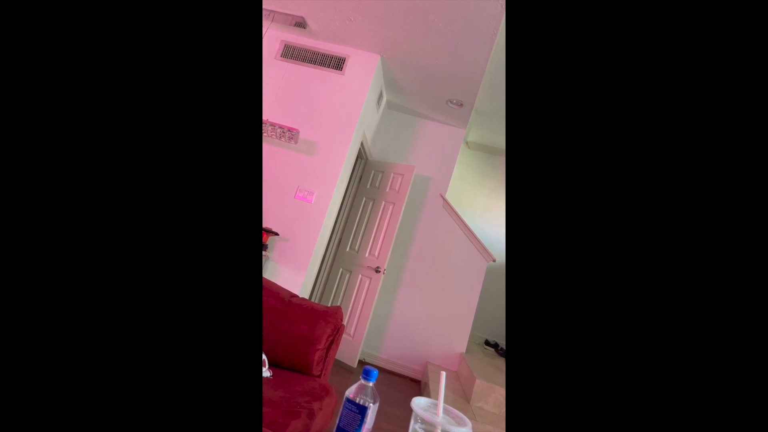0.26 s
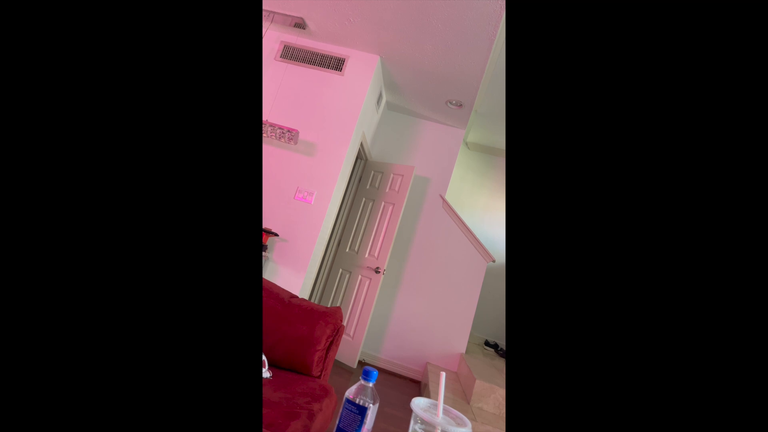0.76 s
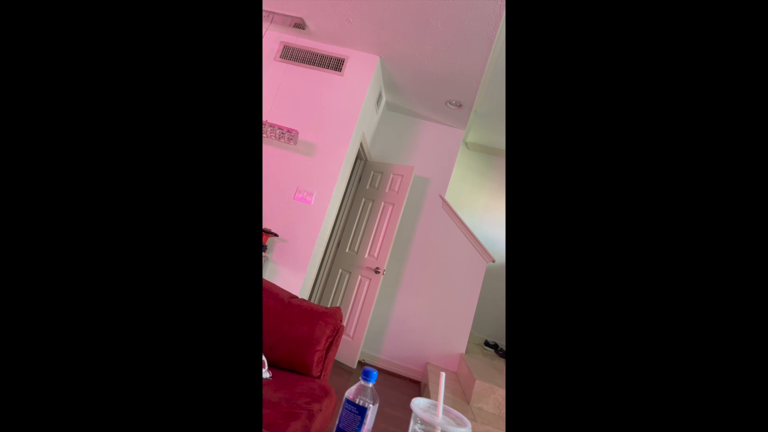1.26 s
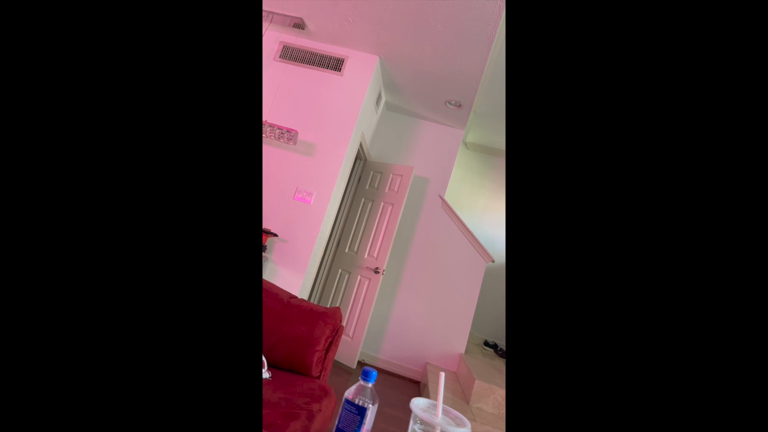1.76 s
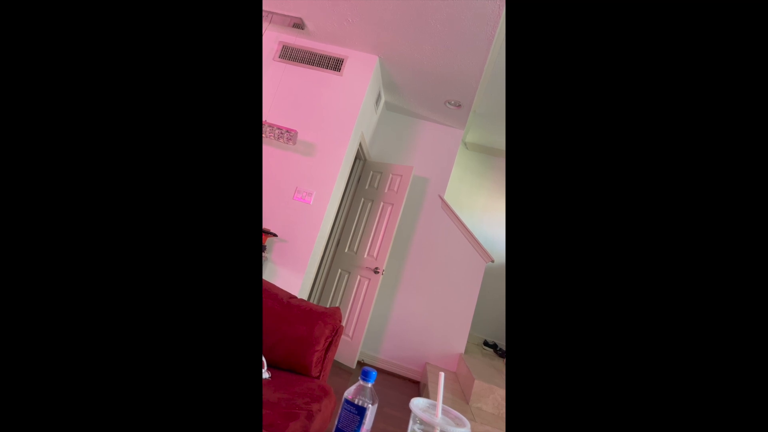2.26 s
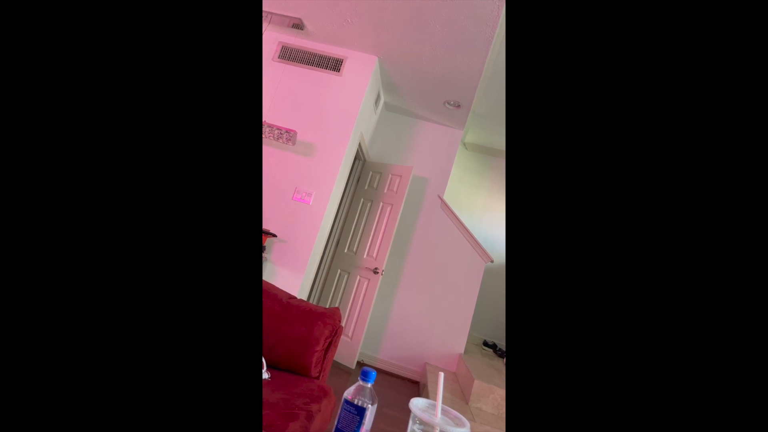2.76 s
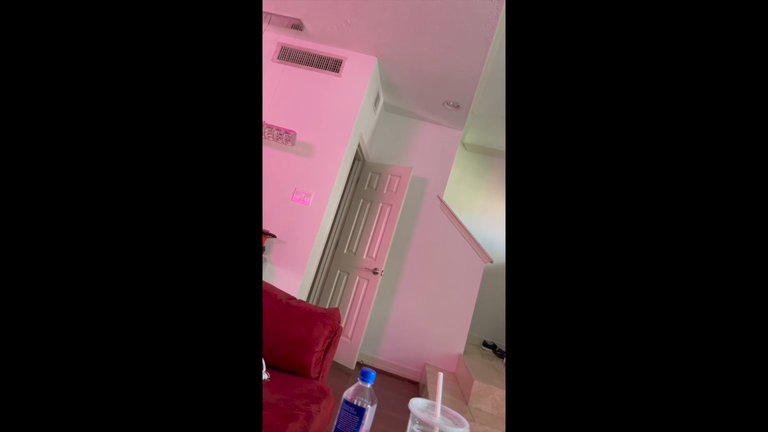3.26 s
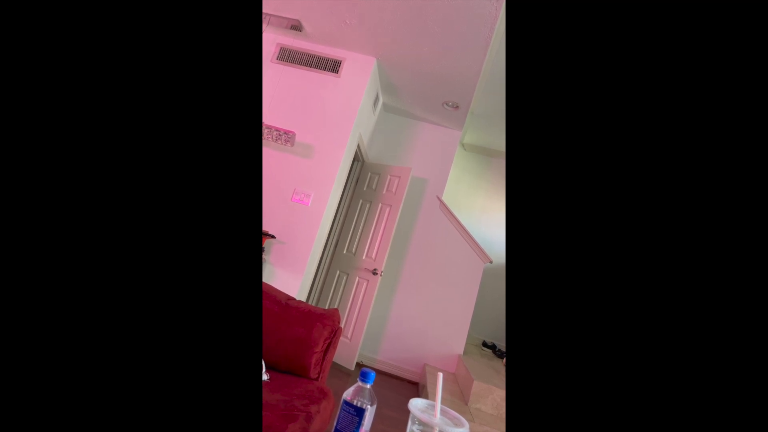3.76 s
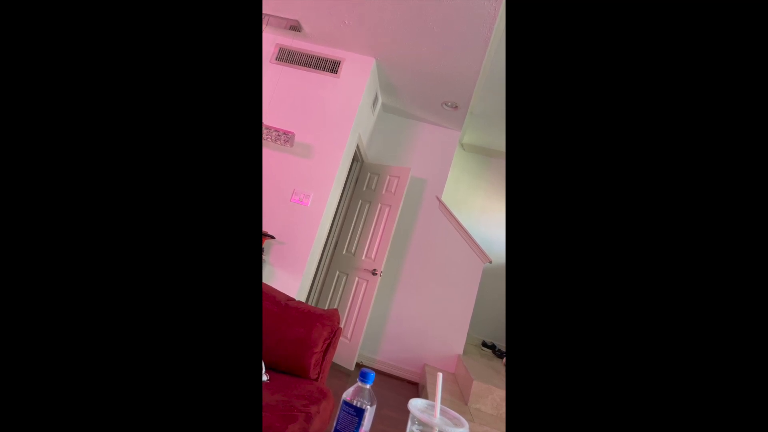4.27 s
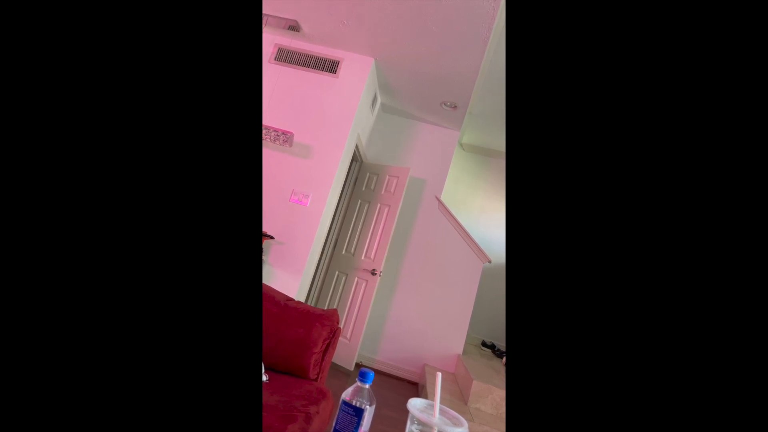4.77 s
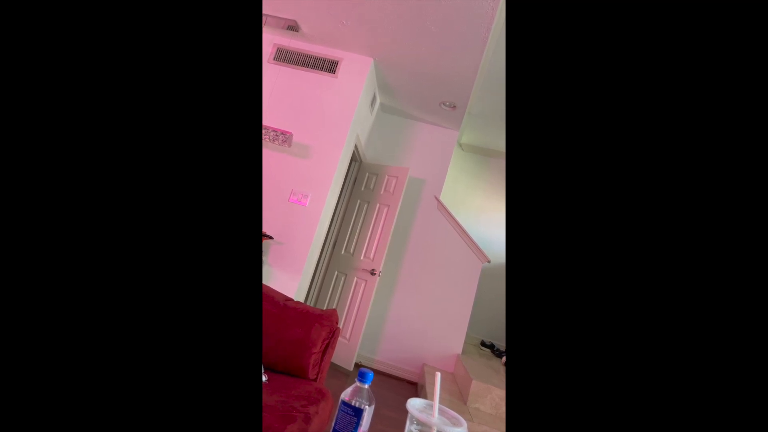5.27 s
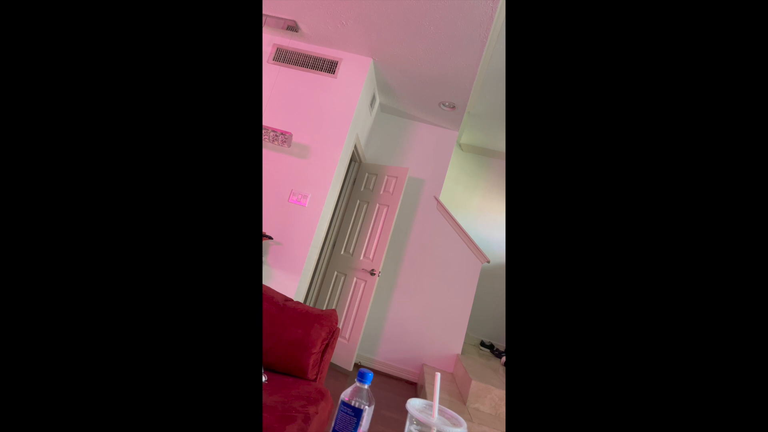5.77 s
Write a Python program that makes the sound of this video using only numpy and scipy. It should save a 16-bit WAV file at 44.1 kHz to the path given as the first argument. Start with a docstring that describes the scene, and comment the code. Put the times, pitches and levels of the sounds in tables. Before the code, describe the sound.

From 0 to 1.7 seconds a quiet bedroom is heard: a steady low air-conditioning hum, bass-heavy moving air with a faint vent whistle, small soft rustles near the microphone, the clearest around 1.6, and very faint high bird peeps between 0.45 and 1.2. At about 1.7 a hammer drill next door starts, its pitch and loudness climbing with a rumbling boom, reaching full speed near 2.35. Until about 3.7 it holds a loud, rough buzz of roughly fifty blows per second, with gritty grinding, a metallic bit ring and wide bright fan hiss; the tone wavers as the bit shifts. It eases and dulls, is released at 3.9, drops in pitch and dies by about 4.3. Hum and air remain to the end at about 6 seconds, with light rustles at 4.3, 4.7 and 5.4 and faint peeps from 5.1 to 5.7.

```python
"""A quiet bedroom: air conditioning hums and whispers, something rustles, a bird peeps faintly outside.
Then a hammer drill next door spins up, bites into the wall and stops.
Its blows are wavering multiples of the blow rate, coloured by wall and room into a buzz.
Shaped noise makes its grinding and fan hiss, the air and the rustle; resonances ring bit, wall and vent."""
import sys
import numpy as np
from scipy import signal
from scipy.fft import rfft, irfft, next_fast_len
from scipy.io import wavfile
from scipy.ndimage import uniform_filter1d

SR = 44100
rng = np.random.default_rng(int(sys.argv[2]) if len(sys.argv) > 2 else 0)


def generate_wav(signal):
    """Clip the signal to [-1, 1] and save it as 16-bit WAV at the path in sys.argv[1]."""
    frames = np.transpose(np.atleast_2d(signal))
    scaled = np.clip(frames, -1, 1) * 32767
    pcm = np.round(scaled).astype(np.int16)
    wavfile.write(sys.argv[1], SR, pcm)


N = 264898

# compressors and mains a little out of step: (pitch [Hz], level [dB rms], left over right [dB])
HUM_TONES = [(55.1, -54.5, 0), (58.45, -60, 0), (58.8, -59.5, 0), (59.95, -57.5, -0.5),
             (116.95, -50.5, 1.5), (176, -79.5, 5), (233.6, -72.5, 7), (288, -73.5, 10), (328.5, -75.5, 9),
             (414.2, -69.5, 8), (474, -72.5, 13), (530, -77, 2.5)]
# air spectra, centre and side: (frequency [Hz], relative density [dB per Hz])
AIR_CENTRE = [(15, -31), (30, -12.5), (45, -7), (75, -4.5), (122, -8), (168, -8), (301, -14.5),
              (472, -22.5), (600, -21.5), (1130, -33.5), (2000, -38), (3000, -48), (5000, -55.5),
              (8000, -58), (8700, -76), (11300, -79), (12500, -55), (14000, -62)]
AIR_SIDE = [(15, -52.5), (25, -18.5), (60, -17), (107, -0.5), (257, -7.5), (472, -3), (1600, -22.5),
            (3530, -33.5), (4850, -44.5), (5390, -44), (8910, -39), (12900, -42.5), (14000, -56)]
# how far side noise follows centre; the bass leans left: (frequency [Hz], likeness [0..1])
NOISE_LEAN = [(60, .3), (250, 0.31), (500, 0.088), (1000, .01)]
# vent grille resonances: (pitch [Hz], width [Hz], level before flicker [dB rms])
VENT_RESONANCES = [(1833, 79, -81.5), (1280, 25, -90.5), (2650, 310, -87.5), (3510, 550, -88)]
# rustle swells: (start [s], peak level [dB], time to peak [s])
RUSTLES = [(0.0, -87, 0.033), (.3, -81, 0.15), (.6, -77, 0.089), (1.1, -92, 0.058), (1.58, -73.5, 0.035),
           (4.26, -80, 0.067), (4.72, -86.5, 0.06), (5.35, -79, 0.044), (5.45, -88.5, .15)]
# rustle spectrum: (frequency [Hz], relative density [dB per Hz])
RUSTLE_COLOUR = [(800, -26.5), (1500, 0), (2600, 1.5), (4200, -3.5), (5500, -18), (8500, -25.5),
                 (11000, -32), (13000, -9.5), (14000, -18.5)]
# bird peeps: (start [s], peak level [dB], pitch [Hz], time to peak [s])
PEEPS = [(0.4534, -82.5, 6130, 0.043), (0.704, -84, 6200, 0.025), (1.097, -89, 6150, 0.036),
         (5.098, -85.5, 6150, 0.02), (5.44, -90, 6200, 0.028), (5.666, -79.5, 6170, 0.043)]
# how hard the bit works in the wall, as loudness: (time [s], level [dB])
LOAD = [(1.695, -74), (1.83, -58), (1.95, -46.5), (2.1, -41), (2.29, -39.5), (2.39, -36.5), (2.6, -36.5),
        (3.03, -37.5), (3.28, -36.5), (3.4, -39.5), (3.5, -40.5), (3.56, -40), (3.66, -38), (3.85, -37.5),
        (3.93, -39), (4.0, -45), (4.07, -51), (4.15, -60.5), (4.35, -74)]
# wall and room response at full speed, one row per multiple of the blow rate from the 2nd up:
# (relative centre [dB], relative side [dB], lean [-1 right .. 1 left])
BUZZ_RESPONSE = [(-56.5, -78.5, 0.9), (-70.0, -82.5, 1.0), (-49.0, -62.0, 1.0), (-68.5, -85.5, -0.2),
                 (-67.0, -68.5, 0.9), (-49.0, -55.5, 0.9), (-43.0, -50.5, 0.7), (-49.5, -58.0, 1.0),
                 (-73.5, -56.0, -0.1), (-59.5, -56.0, -0.8), (-54.5, -51.0, -0.8), (-51.0, -56.5, -0.7),
                 (-52.5, -61.5, 0.0), (-54.5, -65.5, -0.7), (-49.0, -50.0, 0.6), (-52.5, -60.5, 0.8),
                 (-56.0, -53.5, 0.5), (-50.5, -54.5, 0.1), (-46.5, -53.5, -1.0), (-61.5, -54.5, -0.7),
                 (-48.5, -61.0, -0.9), (-45.5, -52.5, 0.5), (-54.0, -50.0, 0.4), (-44.5, -65.5, -0.2),
                 (-56.5, -53.0, -0.1), (-52.5, -56.5, -1.0), (-61.0, -57.0, -0.9), (-52.5, -53.0, -0.5),
                 (-47.5, -64.0, 1.0), (-43.0, -62.5, 0.2), (-50.5, -48.5, -0.7), (-48.0, -50.5, -1.0),
                 (-49.5, -56.0, 0.3), (-50.0, -63.0, -0.9), (-48.0, -58.5, 0.6), (-47.0, -60.0, 1.0),
                 (-53.5, -63.5, 0.3), (-56.5, -63.0, 0.3), (-59.5, -62.0, 0.9), (-54.5, -55.5, -0.7),
                 (-51.5, -54.5, 0.0), (-60.0, -58.0, 0.7), (-52.0, -52.0, 1.0), (-59.5, -54.5, 1.0),
                 (-49.5, -58.0, -0.5), (-54.0, -54.5, 0.8), (-55.5, -59.0, 0.0), (-51.5, -62.5, 0.2),
                 (-62.5, -57.0, -0.3), (-54.0, -56.0, -1.0), (-56.5, -68.5, -0.8), (-60.0, -51.0, -0.4),
                 (-59.5, -56.0, 0.8), (-58.5, -67.0, -0.8), (-57.0, -54.0, -0.9), (-56.0, -56.5, -0.7),
                 (-58.0, -63.5, -0.5), (-56.0, -58.5, -0.6), (-58.0, -66.0, -1.0)]
# the same for higher multiples, before random scatter: (frequency [Hz], relative level [dB])
UPPER_BUZZ = [(3100, -61), (3300, -64), (3550, -60.5), (3700, -63.5), (3930, -57.5), (4150, -63.5),
              (4300, -61), (4500, -64.5), (4700, -63), (5000, -69.5), (5300, -70.5), (6200, -77.5)]
# buzz swells as the bit shifts in the hole: (time [s], low [dB], middle [dB], high region [dB])
SHIFTS = [(2.3, -3, -3, 0), (2.4, -4, -0.4, 0.5), (2.54, -5, 1, -1), (2.62, -1, 1.3, 1), (2.69, -7, 1.5, 1),
          (2.77, 0.5, -1.2, 2), (2.85, -3, 1.5, 2), (2.95, 3, -1, 0.5), (3.04, -2.5, 0, 1),
          (3.11, -2, 1, 1), (3.19, 2.5, -4, 1.7), (3.3, 0, -1, 1.5), (3.4, 0, 0.6, 0), (3.47, 1, -7, -3.5),
          (3.53, -2, -0.9, -5), (3.62, 3, 1.5, 0), (3.73, 3.5, -3.5, 0.5), (3.8, -1, 1.1, 0),
          (3.87, 3, -4, 0), (3.96, -1, -5, -8)]
# those regions: (centre at full speed [Hz], width [octaves])
SHIFT_REGIONS = [(1200, 0.18), (1720, 0.184), (2450, 0.36)]
# grinding spectra, centre and side: (frequency [Hz], relative density [dB per Hz])
GRIND_CENTRE = [(70, -31.5), (150, -13), (250, -6.5), (350, -9), (600, -7), (900, -4), (1100, -8),
                (1300, -3), (1800, -2.5), (2400, -6), (3300, -6.5), (4400, -7), (6500, -24.5), (8400, -76)]
GRIND_SIDE = [(70, -46.5), (140, -21), (250, -12.5), (420, -8), (900, -3.5), (1500, 0), (2800, -1),
              (4700, -9), (6500, -36.5), (8400, -58.5)]
# wall resonances heard away from full speed: (pitch [Hz], width [Hz], level against the load [dB])
WALL_RESONANCES = [(225, 90, -18.5), (1410, 810, -16.5), (410, 80, -21.5), (678, 60, -16.5),
                   (760, 360, -14), (993, 63, -16), (1298, 56, -16), (1603, 130, -14.5), (1934, 120, -17.5),
                   (2420, 61, -22)]
# motor fan spectra, centre and side: (frequency [Hz], relative density [dB per Hz])
FAN_CENTRE = [(3530, -6.5), (6000, -2), (6770, -4), (8980, 8), (9850, -1), (10400, -87), (11000, -5),
              (11600, -1.5), (12700, -6), (14000, -7)]
FAN_SIDE = [(3240, -55), (5500, -16), (5880, -22), (6660, -34), (8450, 0.5), (8960, 0), (10200, -2),
            (11700, -11), (13200, -24), (14000, -49)]
# top of the hiss against the rest of it: (time [s], level [dB])
TOP_LEVEL = [(2.2, 1), (2.28, -1), (2.36, 0.5), (2.6, 3.5), (3.0, 2.5), (3.25, 4), (3.35, 1.5), (3.45, -4),
             (3.55, -3), (3.63, -0.5), (3.8, -1), (3.9, -1.5), (4.0, -10), (4.1, -9)]

AIR_DB = -55.5
# trigger pulled, full speed reached, let go, silence
START_S, FULL_S, OFF_S, END_S = 1.696, 2.355, 3.87, 4.35
FULL_SPEED_HZ = 51.72      # blows per second
SPIN_UP_HZ_PER_S, COAST_HZ_PER_S = 42, 54
SETTLE_S, LET_GO_S = 0.03, 0.01      # corner rounding; speed breaks off more abruptly than it settles
WOBBLE_HZ, WOBBLE_RATE_HZ = 0.08, 6      # the blow rate wavers
FULL_LOAD_DB, SLACK_DULL_DB_PER_OCT_PER_DB = -38, 0.32      # below this load the sound dulls
EASE_S, EASE_LENGTH_S, EASE_DULL_DB_PER_OCT = 3.682, 0.29, -18      # the bit is eased off
BUZZ_DB, STUMBLE_LOSS_DB = 1.68, 5      # against the load; loss away from full speed
SEATED_S, SEATING_S = 2.46, 0.013      # until the bit has seated, the wall booms around one pitch
BOOM_HZ, BOOM_OCTAVES, BOOM_DB = 730, 0.16, 6
CONTROL_STEP = 50      # samples between slow control values
# full depths, reached by high multiples only
WANDER_DB, WANDER_RATE_HZ, FLUTTER_DB, FLUTTER_RATE_HZ = 1.0, 3, 2.2, 7
PATCH_DB, PATCH_RATE_HZ, PATCH_SIZE = 2.2, 6, 5      # groups of high multiples swell together
GRIND_DB, SLOW_GRIND_DB = -8.5, 21      # against the load; gain towards standstill in spin-up
BIT_HZ, BIT_WIDTH_HZ, BIT_DB, SLOW_BIT_DB = 4280, 25, -17, 9.6      # same references
FAN_DB, FAN_POWER = -46, 1.94      # at full speed and load; amplitude power of spin-up speed
FAN_FOLLOWS = 0.86      # share of the slackening that the hiss follows
FAN_RISE_DB, FAN_RISE_S = -26, 0.097
FAN_RUNS_ON_S, FAN_DYING_DB_PER_S = 0.14, -120      # after let-go
FAN_DULLING_DB_PER_OCT_PER_S = -15.5      # from let-go
TOP_HZ = 10400      # the hiss above has its own level
STOPBAND_HZ = 14131


def from_db(db):
    """Decibels to gain."""
    return 10 ** (np.asarray(db) / 20)


def rms_one(x):
    """Scale to rms 1."""
    return x / np.sqrt(np.mean(x ** 2) + 1e-20)


def in_time(rows):
    """Columns of a curve table, sample by sample."""
    s, *columns = np.transpose(rows)
    return [np.interp(np.arange(N) / SR, s, c) for c in columns]


def at_hz(points, hz):
    """Read a spectrum on a log-frequency axis."""
    table_hz, values = np.transpose(points)
    return np.interp(np.log(hz), np.log(table_hz), values)


def drift(rate_hz, span=slice(None)):
    """Slow random control of rms 1: noise through a double one-pole low-pass."""
    pole = np.exp(-200 * np.pi * rate_hz / SR)      # one value per 100 samples
    noise = rng.standard_normal(N // 100 + 2002)
    slow = signal.lfilter([1], [1, -2 * pole, pole * pole], noise)[2000:]      # settled part
    return np.interp(np.arange(N)[span] / 100, np.arange(len(slow)), rms_one(slow))


def swell(s, rise_s):
    """A quick rise to 1 and a longer fall."""
    age = np.clip((np.arange(N) / SR - s) / max(rise_s, 0.007), 0, 30)
    return age * np.exp(1 - age)


def soft_ramp(seconds, corner_s=SETTLE_S):
    """Time past a moment, with the corner rounded."""
    return corner_s * np.logaddexp(0, seconds / corner_s)


def stereo_noise(spectrum, side, side_db, patchy_db, tilt_db=0, count=11):
    """Coloured centre and side noise in flickering octave bands; centre rms 1 before flicker and tilt."""
    size = next_fast_len(N)
    hz = np.maximum(np.arange(size // 2 + 1) * SR / size, 1)
    mid, other = rfft(rng.standard_normal((2, size)))
    lean = np.clip(at_hz(NOISE_LEAN, hz), 0, 0.95)
    other = lean * mid + np.sqrt(1 - lean ** 2) * other
    mid = mid * from_db(at_hz(spectrum, hz))
    other = other * from_db(at_hz(side, hz) + side_db)
    pair = np.array([mid, other])
    scale = np.std(irfft(mid, size))
    out = 0
    for octave in range(5 - count, 5):      # around 1 kHz; overlapping windows add up to one
        window = np.cos(np.pi / 2 * np.clip(np.log2(hz / 1000) - octave, -1, 1)) ** 2
        gain_db = patchy_db * drift(3.4) + tilt_db * max(octave - 1, 0)
        out = out + irfft(pair * window, size)[:, :N] * from_db(gain_db)
    return np.array([out[0] + out[1], out[0] - out[1]]) / scale


def resonant_noise(hz, width_hz):
    """Stereo noise twice through one resonance; rms 1."""
    b, a = signal.iirpeak(hz, hz / width_hz, fs=SR)
    once = signal.lfilter(b, a, rng.standard_normal((2, N)))
    return rms_one(signal.lfilter(b, a, once))


def above(x, edge_hz):
    """The part of a sound above a pitch."""
    size = next_fast_len(N)
    keep = np.arange(size // 2 + 1) * SR / size > edge_hz
    return irfft(rfft(x, size) * keep, size)[:, :N]


def hum():
    """Steady machine tones that waver slightly in phase and level."""
    t, out = np.arange(N) / SR, 0
    for hz, level_db, pan_db in HUM_TONES:
        waver_rad = min(hz / 240, 0.5) * drift(1.5)
        tone = np.sqrt(2) * np.sin(2 * np.pi * hz * t + rng.uniform(0, 2 * np.pi) + waver_rad)
        pan = from_db([[pan_db / 2], [-pan_db / 2]])
        out = out + tone * from_db(level_db + 0.9 * drift(2.5)) * pan
    return out


def moving_air():
    """Broad, bass-heavy air noise."""
    return from_db(AIR_DB) * stereo_noise(AIR_CENTRE, AIR_SIDE, side_db=-16.5, patchy_db=1.55)


def vent():
    """The grille sings faintly: air noise passed twice through each resonance."""
    out = 0
    for hz, width_hz, level_db in VENT_RESONANCES:
        out = out + from_db(level_db + 3.5 * drift(5.0)) * resonant_noise(hz, width_hz)
    return out


def rustle():
    """Short swells of soft noise close by."""
    level = sum(from_db(peak_db) * swell(s, rise_s) for s, peak_db, rise_s in RUSTLES)
    return level * stereo_noise(RUSTLE_COLOUR, RUSTLE_COLOUR, side_db=-1.5, patchy_db=-2.0, count=7)


def bird():
    """Far peeps, blurred by echoes into a narrow band of noise."""
    out = np.zeros((2, N))
    for s, peak_db, hz, rise_s in PEEPS:
        band = signal.butter(2, [hz - 130, hz + 130], "band", fs=SR, output="sos")
        noise = rms_one(signal.sosfilt(band, rng.standard_normal((2, N))))
        out += from_db(peak_db) * swell(s, rise_s) * noise
    return out


def buzz(blows, speed_hz, tilt_db):
    """Regular blows: multiples of the blow rate, coloured by wall and room, wandering as the bit shifts."""
    on = slice(int(START_S * SR), int(END_S * SR))
    steps = slice(on.start, on.stop, CONTROL_STEP)
    fine, coarse = np.arange(N)[on], np.arange(N)[steps]
    speed = speed_hz[steps]
    multiples = np.arange(2, 120)
    mid_db, side_db, lean = np.transpose(BUZZ_RESPONSE)
    upper_db = at_hz(UPPER_BUZZ, multiples[len(BUZZ_RESPONSE):] * FULL_SPEED_HZ)
    mid_db = np.r_[mid_db, upper_db + rng.normal(0, 2.0, len(upper_db))]
    side_db = np.r_[side_db, upper_db - 3 + rng.normal(0, 3.0, len(upper_db))]
    lean = np.r_[lean, rng.uniform(-1, 1, len(upper_db))]

    uneven = np.clip(20.4 * (1 - speed / FULL_SPEED_HZ), 0, 1)      # away from full speed blows stumble
    unseated = 1 / (1 + np.exp((coarse / SR - SEATED_S) / SEATING_S))
    # uneven blows excite neighbouring resonances too, which blurs the colour
    paths = []
    for sharp_db in (mid_db, side_db):
        blurred_db = 10 * np.log10(uniform_filter1d(from_db(2 * sharp_db), size=5))
        paths.append((sharp_db, blurred_db))
    out, shifts_db = np.zeros((2, N)), in_time(SHIFTS)
    patches = [drift(PATCH_RATE_HZ, steps) for _ in range(multiples[-1] // PATCH_SIZE + 1)]

    for k in multiples:
        jitter_rad = 0.0056 * k * drift(2.9, steps)
        jitter_rad = jitter_rad + (2.22 * uneven + 0.0055 * k) * drift(22.0, steps)
        phase = 2 * np.pi * k * blows[on] + rng.uniform(0, 2 * np.pi)
        phase = phase + np.interp(fine, coarse, jitter_rad)
        # side in step with centre leans left
        apart_rad = np.arccos(np.clip(lean[k - 2], -1, 1)) * rng.choice([-1, 1])

        gain_db = WANDER_DB * min(k / 30, 1) * drift(WANDER_RATE_HZ, steps)
        gain_db = gain_db + FLUTTER_DB * min(k / 20, 1) * drift(FLUTTER_RATE_HZ, steps)
        gain_db = gain_db + PATCH_DB * np.clip(k / 25 - 1.5, 0, 1) * patches[k // PATCH_SIZE]
        gain_db = gain_db + tilt_db[steps] * max(np.log2(k / 40), 0)
        gain_db = gain_db + 0.89 * uneven * max(np.log2(24 / k), 0)      # stumbling blows rumble
        boom_distance = np.log2(k * speed / BOOM_HZ) / BOOM_OCTAVES
        gain_db = gain_db + BOOM_DB * unseated * np.exp(-boom_distance ** 2)
        for (hz, octaves), shift_db in zip(SHIFT_REGIONS, shifts_db):
            nearness = np.exp(-(np.log2(k * FULL_SPEED_HZ / hz) / octaves) ** 4)
            gain_db = gain_db + shift_db[steps] * nearness

        place = k * speed / FULL_SPEED_HZ      # the response stays put while the pitch moves
        levels = []
        for sharp_db, blurred_db in paths:
            path_db = np.interp(place, multiples, sharp_db) * (1 - uneven)
            path_db = path_db + np.interp(place, multiples, blurred_db) * uneven
            levels.append(np.interp(fine, coarse, from_db(path_db + gain_db)))
        mid = levels[0] * np.sin(phase)
        side = levels[1] * np.sin(phase + apart_rad)
        out[:, on] += [mid + side, mid - side]
    return out / np.sqrt(np.sum(from_db(2 * mid_db)) / 2)


def grind(throb, slow, tilt_db):
    """The bit grinds: noise that throbs with each blow, louder while spinning up."""
    noise = stereo_noise(GRIND_CENTRE, GRIND_SIDE, side_db=-5.0, patchy_db=0.5, count=9, tilt_db=tilt_db)
    return from_db(GRIND_DB + SLOW_GRIND_DB * slow) * noise * (1 + 0.19 * throb)


def bit_ring(slow, tilt_db):
    """The steel bit rings at one pitch whatever the speed."""
    level_db = BIT_DB + SLOW_BIT_DB * slow + tilt_db + 2.0 * drift(3.6)
    return from_db(level_db) * resonant_noise(BIT_HZ, BIT_WIDTH_HZ)


def wall_rumble(speed_hz):
    """Away from full speed the wall rumbles at its own resonances, in the centre."""
    rumble = 0
    for hz, width_hz, level_db in WALL_RESONANCES:
        rumble = rumble + from_db(level_db) * resonant_noise(hz, width_hz)[0]
    return np.clip(30 * (1 - speed_hz / FULL_SPEED_HZ), 0, 1) * rumble


def fan_hiss(t, throb, slow, slack_db):
    """Motor fan: noise growing as a power of spin-up speed, dulling and dying after let-go."""
    level_db = FAN_DB + FAN_FOLLOWS * slack_db + FAN_POWER * 20 * np.log10(1 - slow + 1e-9)
    level_db = level_db + FAN_DYING_DB_PER_S * soft_ramp(t - OFF_S - FAN_RUNS_ON_S)
    level_db = level_db + FAN_RISE_DB * np.exp(-np.maximum(t - START_S, 0) / FAN_RISE_S)
    dulling_db = FAN_DULLING_DB_PER_OCT_PER_S * soft_ramp(t - OFF_S)
    hiss = stereo_noise(FAN_CENTRE, FAN_SIDE, side_db=15.0, patchy_db=1.3, count=4, tilt_db=dulling_db)
    hiss = hiss * (1 + 0.053 * throb)
    hiss = hiss + (from_db(in_time(TOP_LEVEL)[0]) - 1) * above(hiss, TOP_HZ)
    return from_db(level_db) * hiss


def drill():
    """One blow rate and one load drive buzz, grinding, ringing and wall rumble; the fan hisses along."""
    t = np.arange(N) / SR
    missing_hz = SPIN_UP_HZ_PER_S * soft_ramp(FULL_S - t)
    lost_hz = COAST_HZ_PER_S * soft_ramp(t - OFF_S, LET_GO_S)
    speed_hz = np.maximum(FULL_SPEED_HZ - missing_hz - lost_hz, 1)
    slow = np.clip(missing_hz / FULL_SPEED_HZ, 0, 1)      # spin-up only
    blows = np.cumsum(speed_hz + WOBBLE_HZ * drift(WOBBLE_RATE_HZ)) / SR
    throb = np.cos(2 * np.pi * blows)

    load_db, = in_time(LOAD)
    slack_db = np.clip(load_db - FULL_LOAD_DB, -5, 0)
    tilt_db = EASE_DULL_DB_PER_OCT * np.clip((t - EASE_S) / EASE_LENGTH_S, 0, 1)
    tilt_db = tilt_db + SLACK_DULL_DB_PER_OCT_PER_DB * slack_db
    buzz_db = BUZZ_DB - STUMBLE_LOSS_DB * np.clip(7.7 * (1 - speed_hz / FULL_SPEED_HZ), 0, 1)

    at_wall = from_db(buzz_db) * buzz(blows, speed_hz, tilt_db)
    at_wall = at_wall + grind(throb, slow, tilt_db) + bit_ring(slow, tilt_db) + wall_rumble(speed_hz)
    sound = from_db(load_db) * at_wall + fan_hiss(t, throb, slow, slack_db)
    return sound * np.clip((t - START_S) / 0.0083, 0, 1) * (t < END_S)


def scene():
    """Hum, moving air, vent, rustle, bird and drill."""
    return hum() + moving_air() + vent() + rustle() + bird() + drill()


def record(dry):
    """A steep low-pass cuts the top."""
    return signal.sosfilt(signal.cheby2(14, 70, STOPBAND_HZ, fs=SR, output="sos"), dry)


dry = scene()
out = record(dry)
generate_wav(out)
```